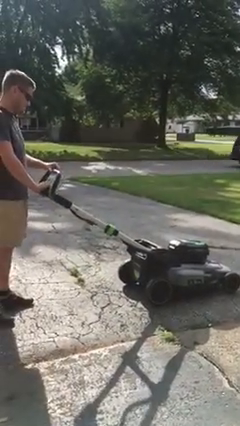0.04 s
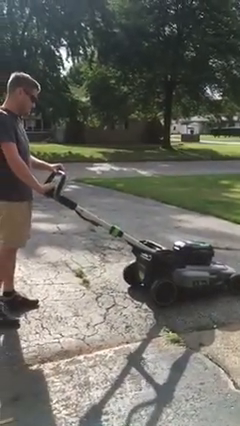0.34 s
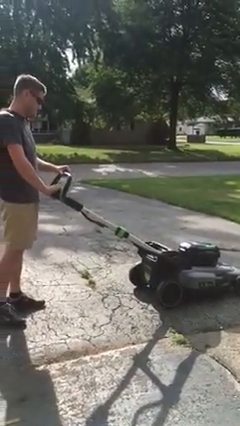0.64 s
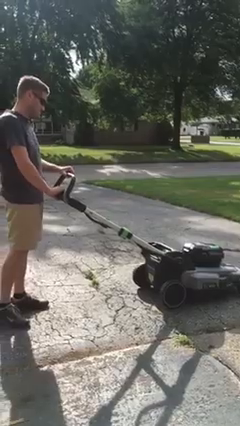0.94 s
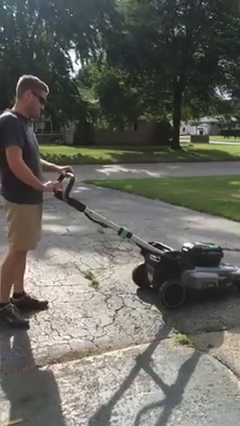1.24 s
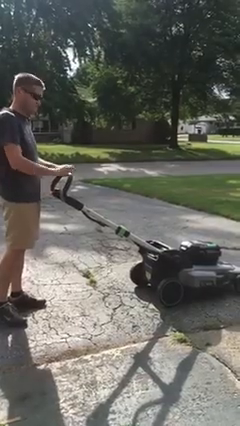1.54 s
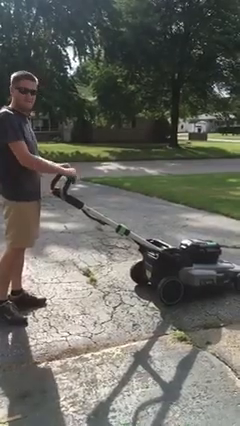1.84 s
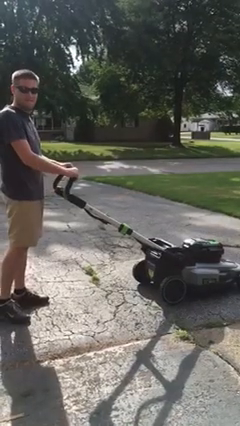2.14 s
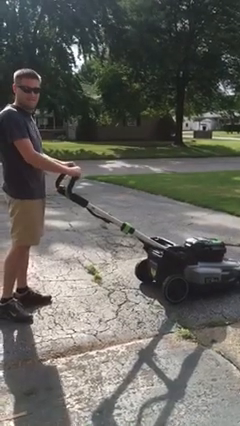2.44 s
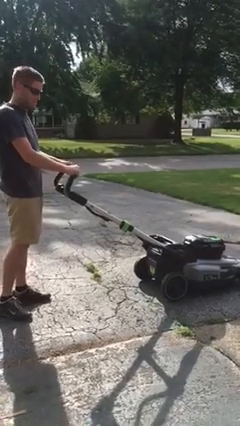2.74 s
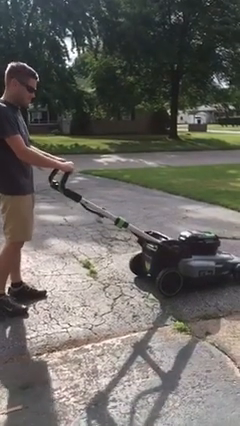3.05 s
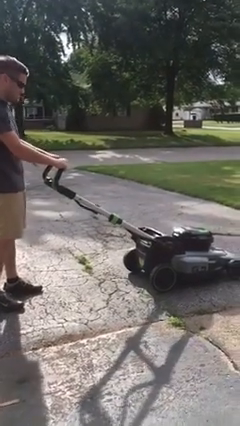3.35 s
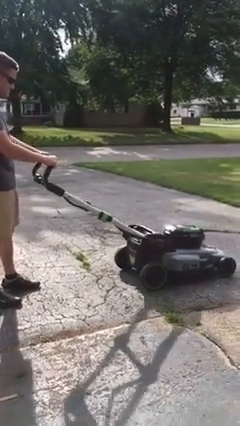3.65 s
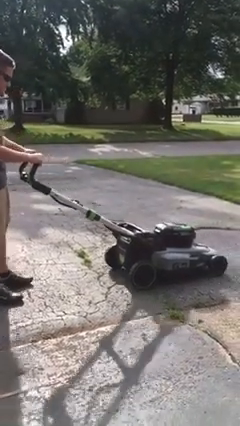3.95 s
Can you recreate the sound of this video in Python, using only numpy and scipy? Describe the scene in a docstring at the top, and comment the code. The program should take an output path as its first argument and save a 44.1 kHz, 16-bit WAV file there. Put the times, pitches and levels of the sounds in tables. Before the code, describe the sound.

An electric lawn mower starts outdoors over a low, steady traffic rumble. A faint, high whistle comes in at about 0.3 seconds and fades around one second, while the motor growls upward and the blade's airy whir swells. A light knock comes near 1.5 seconds. From about two seconds the mower runs at full speed, a steady rushing roar with a throbbing hum, until the end at four seconds.

```python
"""A battery lawn mower starts on a driveway, over the steady rumble of street traffic. The switch ticks, then
the motor drive whistles and the motor's growl climbs as the blade spins up. The blade chops a swelling rush of
air that rings in the deck. Around one second the whistle dies away and a hum rises, one pulse of air per blade
pass. The deck gives a light knock, and the mower settles near full speed while the low end throbs."""
import sys
import numpy as np
from scipy import signal
from scipy.fft import rfft, irfft
from scipy.io import wavfile

SR = 44100
rng = np.random.default_rng(int(sys.argv[2]) if len(sys.argv) > 2 else 0)


def wrap_up_sound(samples):
    """Save the sound to the file named by the first command line argument, as 16-bit audio."""
    columns = np.atleast_2d(samples).T
    # keep every value between -1 and 1, then stretch to whole-number steps
    tamed = np.clip(columns, -1, 1)
    steps = np.round(tamed * 32767).astype(np.int16)
    wavfile.write(sys.argv[1], SR, steps)


N = 176400
T = np.arange(N) / SR
HZ = np.maximum(np.fft.rfftfreq(N, 1 / SR), 1)
FULL_SPEED_HZ = 87  # blade passes per second, two per turn

# The blade's spin-up: time_s, pass_rate_hz
BLADE_SPEED = [(.27, 5), (.45, 26), (.58, 33.7), (.8, 42.6), (1.0, 51), (1.24, 62.2), (1.45, 70.3),
               (1.67, 79.8), (1.83, 83.8), (2.06, 85.7), (2.42, 86.9), (3.05, 87.1), (3.35, 87.65),
               (4, 89.7)]
# Broad EQ of the air rush at full speed: frequency_hz, relative_level_db
RUSH_EQ = [(40, -27), (110, -9.5), (220, -6), (480, -2.5), (660, -10.5), (1100, -2.5), (1600, -5),
           (2200, -10), (2650, -13.5), (4000, -14), (4900, -21), (6200, -20), (7500, -24.5), (9400, -27.5),
           (10500, -31.5), (15500, -35.5)]
# Resonances and notches of the deck: centre_hz, width_hz, gain_db
DECK_RESONANCES = [(343, 33, -4), (386, 30, -8), (464, 61, 2.5), (576, 60, -1.5), (648, 26.7, 6),
                   (695, 24, -6), (739, 17, 3.5), (880.6, 58, 7.5), (929, 41, 8), (978, 27.3, -1),
                   (1004, 38, 6), (1083.7, 21, 9), (1110, 40, -2.5), (1173, 38, 2), (1220, 86, -1),
                   (1400, 90, 1), (1684, 110, -4), (1820, 80, 1.5), (2117, 65, 7.5), (2130, 43, -8),
                   (2196, 65, 4.5), (3360, 520, 6), (7780, 274, -1.5), (8300, 320, 1.5)]
# How each band of the rush swells and pulses:
# centre_hz, growth_db_per_tenfold_speed, swing_per_pass_db, swing_per_turn_db, flutter_db
RUSH_BANDS = [(201, 38, -1, 0.5, 0.9), (580, 50, 1.5, 0.2, 0.7), (1000, 53, 1.5, .7, 0.93),
              (1350, 47, 1.4, 0.5, 0.75), (2000, 50.5, 0, -0.8, .7), (2730, 64, .6, .3, .6),
              (3370, 71, .5, -1, 0.4), (4360, 74, .4, .2, 0.65), (7000, 59, 0.2, -0.7, 0.3),
              (13000, 59, 1, 0.5, 0.4)]
# Fader ride on the roar around 1 kHz, on top of its growth with speed: time_s, gain_db
ROAR_RIDE = [(.45, -6), (.65, -2), (.76, -1), (.84, 5), (1.0, -1.5), (1.17, -2.5), (1.42, 0), (1.54, 2),
             (1.7, -1), (2.3, 0), (3.0, 0), (3.08, -2), (3.16, -0.5), (4, .5)]
# Overtones of the hum: pass_rate_multiple, full_speed_level_db, growth_db_per_tenfold_speed, waver_share
HUM_OVERTONES = [(2, -31.7, 112, .07), (3, -35.7, 64, .12), (4, -50, -15, .25), (5, -45.5, 130, .25),
                 (6, -49, 90, .3), (7, -61, 60, .6), (10, -55, 60, .7), (12, -55, 60, .7)]
# Throb of the hum's fundamental: time_s, level_db
HUM_THROB = [(1.5, -41), (1.54, -37), (1.93, -33), (1.98, -41), (2.11, -34), (2.33, -39), (2.42, -38),
             (2.49, -29.5), (2.66, -40.5), (2.78, -29.5), (2.94, -41), (2.99, -34.5), (3.11, -30.5),
             (3.16, -40), (3.3, -30.5), (3.38, -40.5), (3.45, -28), (3.5, -40), (3.55, -31.5), (3.63, -39),
             (3.67, -30), (3.72, -38), (3.76, -32), (4.0, -34.5)]
# Fader ride on the growl, with swells drawn in where it crosses deck resonances: time_s, level_db
GROWL_RIDE = [(.38, -64.5), (.46, -41.5), (.53, -66), (.61, -46), (.72, -48), (.79, -40.5), (.87, -50.5),
              (.98, -47.5), (1.04, -58), (1.3, -49.5), (1.5, -61), (2, -51)]
# Fader ride on the drive's whistle: time_s, gain_db
WHISTLE_RIDE = [(.262, -100), (.275, -73), (.295, -79), (.315, -59), (.335, -70), (.6, -70), (1.02, -70),
                (1.08, -100)]
# Sidebands around the whistle: offset_in_pass_rates, relative_level_db
WHISTLE_SIDEBANDS = [(-2, -10), (2, -9), (4, -9), (6, -6)]
# EQ of the traffic bed: frequency_hz, relative_level_db
TRAFFIC_EQ = [(15, -57), (25, -14), (59, 3), (113, -1.5), (144, -11.5), (164, -6), (215, -5), (253, -6.5),
              (566, -26.5), (919, -19), (1050, -24), (1490, -27.5), (2170, -32), (2550, -34.5),
              (3530, -36.5), (5880, -42), (15500, -57.5)]


def air_rush(phase, speed_decades):
    """Turbulence coloured by the deck; each band swells with speed and is chopped by the blade."""
    level_db, roar_hz, roar_width_octaves = -31, 995, 0.96
    chop_lead_rad = 2.2  # the air is loudest just before the pulse
    spectrum = rfft(coloured_noise(deck_colour()))
    surge_db = 0.36 * drift(rate_hz=8.2)
    log_centres = np.log([row[0] for row in RUSH_BANDS])
    rush = 0
    for solo, (hz, growth, pass_db, turn_db, flutter_db) in zip(np.eye(len(RUSH_BANDS)), RUSH_BANDS):
        band = irfft(spectrum * np.interp(np.log(HZ), log_centres, solo), N)  # neighbours crossfade
        chop_db = pass_db * np.cos(phase + chop_lead_rad) + turn_db * np.cos(phase / 2)
        roar_db = curve(ROAR_RIDE) * bell(np.log2(hz / roar_hz), 0, roar_width_octaves)
        motion_db = chop_db + surge_db + flutter_db * drift(rate_hz=41)
        rush += band * from_db(level_db + growth * speed_decades + roar_db + motion_db)
    return rush


def deck_colour():
    """EQ of the rush in dB: broad slope, deck resonances, and ripple from the deck's many small modes."""
    grid_hz = np.arange(0, SR / 2, 22)
    ripple_db = 1.2 * np.interp(HZ, grid_hz, rng.standard_normal(len(grid_hz)))
    ripple_db *= np.interp(HZ, [1300, 1900], [0, 1])  # upper mids and treble only
    resonances_db = sum(db * bell(HZ, hz, width) for hz, width, db in DECK_RESONANCES)
    return eq_db(RUSH_EQ) + resonances_db + ripple_db


def blade_hum(phase, pass_hz, speed_decades):
    """One push of air per blade pass: a throbbing fundamental under wavering overtones."""
    emerge_s, throb_fade_s = (0.82, 1.29), 0.12
    throb_fade_in = np.exp(np.minimum(T - HUM_THROB[0][0], 0) / throb_fade_s)
    hum = throb_fade_in * from_db(curve(HUM_THROB)) * np.sqrt(2) * np.cos(phase)
    for multiple, level_db, growth, waver in HUM_OVERTONES:
        dip_db = -9.5 * bell(multiple * pass_hz, centre=152, width=10.6)  # dips gliding through 152 Hz
        gain = from_db(level_db + growth * speed_decades + dip_db)
        hum += gain * wavering_tone(multiple * phase, waver, rate_hz=8)
    return hum * np.interp(T, emerge_s, [0, 1])


def motor_growl(phase):
    """The motor's rough rising tone, eight cycles per blade pass."""
    return from_db(curve(GROWL_RIDE)) * wavering_tone(8 * phase, waver=0.34, rate_hz=34)


def drive_whistle(phase, pass_hz):
    """The drive's switching tone, nearly pure at first, roughens and grows sidebands as the rotor turns."""
    pitch_hz, jitter_rad, roughness = 7875, 0.55, 0.83
    carrier = 2 * np.pi * pitch_hz * T
    turning = np.clip(pass_hz / 35, 0, 1)
    jitter = jitter_rad * turning * drift(rate_hz=120)
    centre = wavering_tone(carrier + jitter, roughness * turning, rate_hz=50)
    sidebands = sum(from_db(db) * wavering_tone(carrier + offset * phase, roughness, rate_hz=70)
                    for offset, db in WHISTLE_SIDEBANDS)
    return from_db(curve(WHISTLE_RIDE)) * (centre * (1 - 0.4 * turning) + turning * sidebands)


def deck_knock():
    """A light knock during the run-up: a few cycles of the deck's main resonance."""
    start_s, level_db, pitch_hz = 1.5638, -23.5, 980
    ring = np.sin(2 * np.pi * pitch_hz * (T - start_s))
    return from_db(level_db) * hit_envelope(start_s, attack_s=0.0012) * ring


def switch_tick():
    """The switch makes contact: one tiny, bright click of noise."""
    level_db, centre_hz, slope_db_per_octave = -68, 7600, -45
    noise = coloured_noise(slope_db_per_octave * np.abs(np.log2(HZ / centre_hz)))
    return from_db(level_db) * hit_envelope(start_s=0.225, attack_s=0.002) * noise


def traffic_rumble(level_db=-43.5):
    """Street traffic as a steady, bass-heavy bed of noise."""
    return from_db(level_db) * coloured_noise(eq_db(TRAFFIC_EQ))


def from_db(db):
    """Decibels to gain."""
    return 10 ** (np.asarray(db) / 20)


def curve(points):
    """An automation curve, sample by sample."""
    return np.interp(T, *np.transpose(points))


def eq_db(points):
    """An EQ curve, its points joined on a log-frequency axis."""
    hz, db = np.transpose(points)
    return np.interp(np.log(HZ), np.log(hz), db)


def coloured_noise(shape_db):
    """Noise through the given EQ, scaled to rms 1."""
    noise = irfft(rfft(rng.standard_normal(N)) * from_db(shape_db), N)
    return noise / np.sqrt(np.mean(noise ** 2) + 1e-20)


def drift(rate_hz):
    """A random modulator of rms 1, rolling off above the given rate."""
    return coloured_noise(-20 * np.log10(1 + (HZ / rate_hz) ** 2))


def wavering_tone(phase, waver, rate_hz):
    """A sine of rms 1 plus a narrow halo of noise that makes it waver."""
    halo = drift(rate_hz) * np.cos(phase) + drift(rate_hz) * np.sin(phase)
    return np.sqrt(2) * np.cos(phase) + waver * halo


def bell(position, centre, width):
    """A resonance shape: 1 on top, with its full width taken at half height."""
    return 1 / (1 + (2 * (position - centre) / width) ** 2)


def hit_envelope(start_s, attack_s):
    """A short contact: quick attack, exponential tail."""
    age = np.maximum(T - start_s, 0) / attack_s
    return age * np.exp(1 - age)


def scene():
    """The mower, driven by its blade speed, mixed in mono over the traffic."""
    pass_hz = curve(BLADE_SPEED)
    phase = 2 * np.pi * np.cumsum(pass_hz) / SR  # one cycle per blade pass
    speed_decades = np.log10(pass_hz / FULL_SPEED_HZ)
    mower = blade_hum(phase, pass_hz, speed_decades) + motor_growl(phase)
    mower += air_rush(phase, speed_decades)
    mower += drive_whistle(phase, pass_hz) + switch_tick() + deck_knock()
    return (mower + traffic_rumble())[None]


def record(dry):
    """A steep high cut on the whole mix."""
    cutoff_hz = 15650
    return signal.sosfilt(signal.ellip(12, .1, 80, cutoff_hz, fs=SR, output="sos"), dry)


dry = scene()
out = record(dry)
wrap_up_sound(out)
```